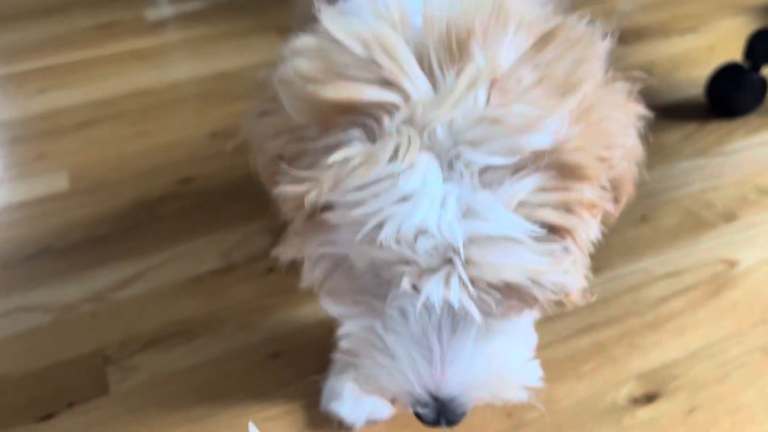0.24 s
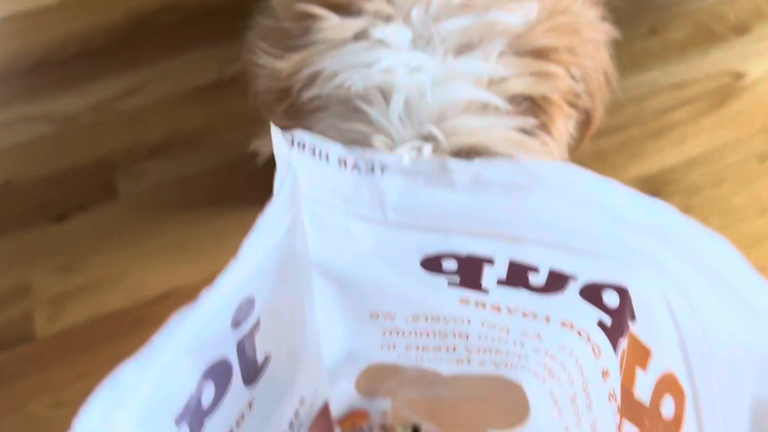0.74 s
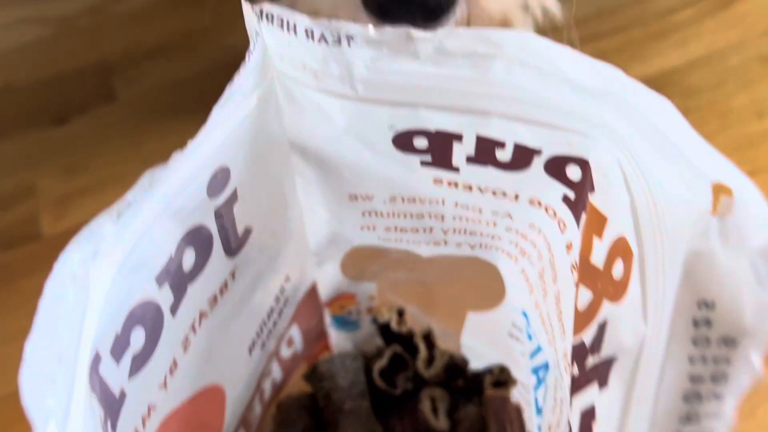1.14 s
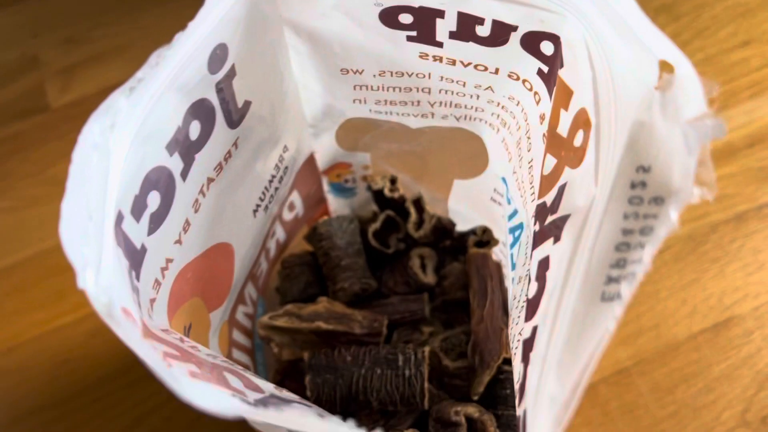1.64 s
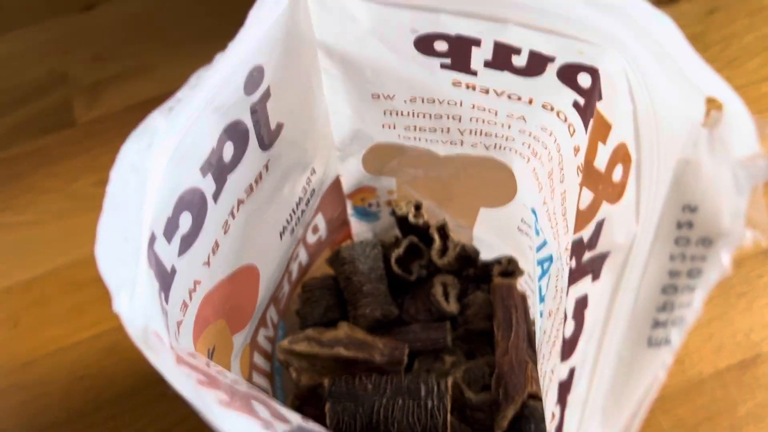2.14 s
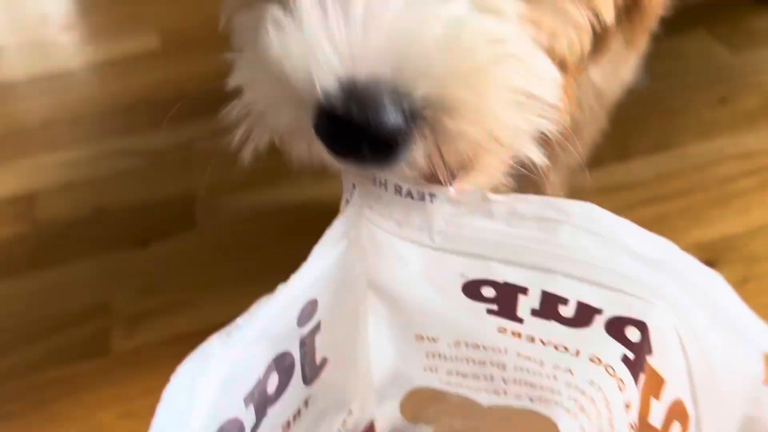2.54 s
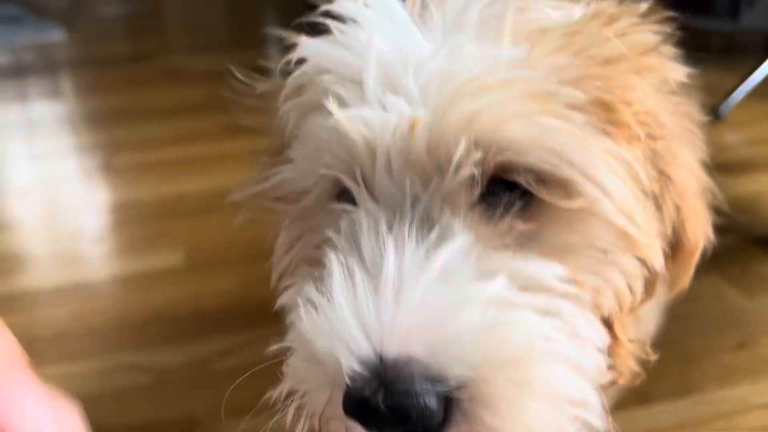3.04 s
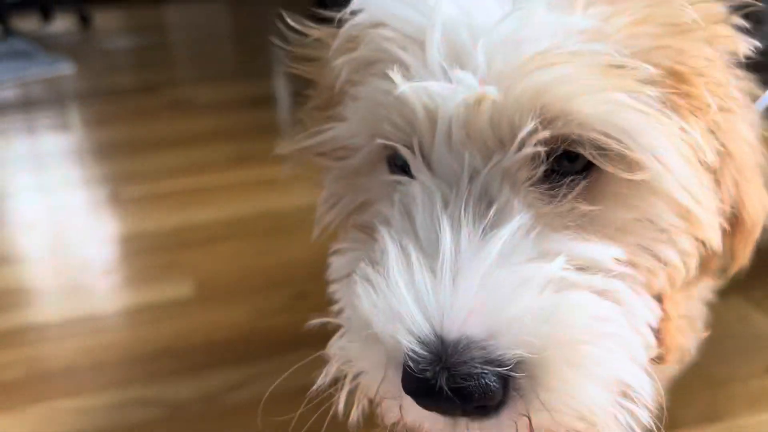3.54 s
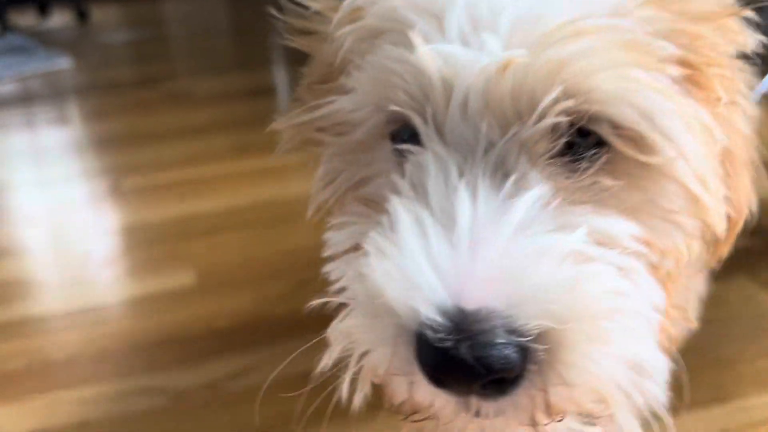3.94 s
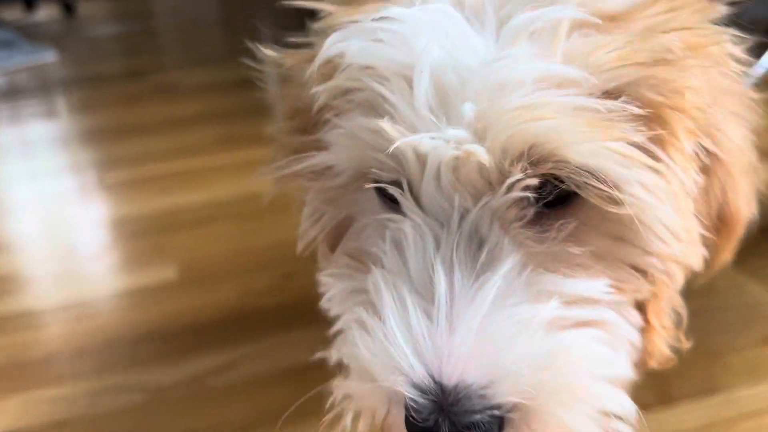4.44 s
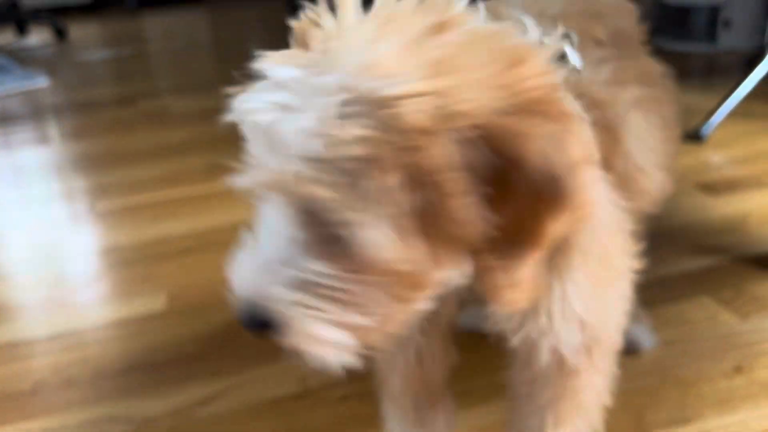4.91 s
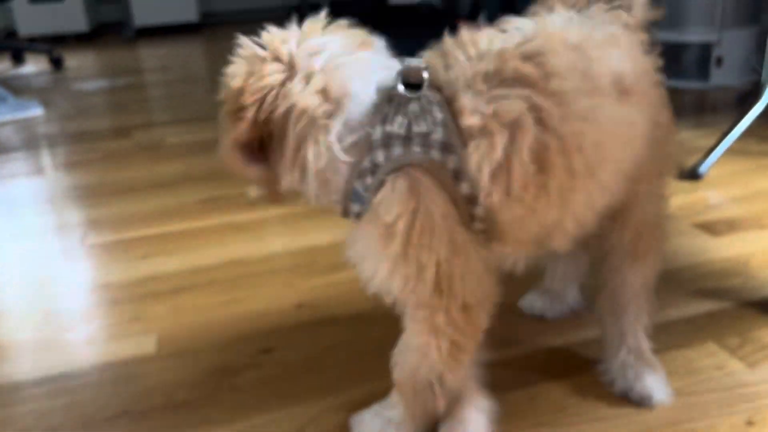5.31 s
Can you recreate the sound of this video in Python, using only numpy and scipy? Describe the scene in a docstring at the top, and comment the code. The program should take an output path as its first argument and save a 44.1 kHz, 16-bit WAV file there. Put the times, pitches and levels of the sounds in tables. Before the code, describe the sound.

Near silence with soft paw taps gives way to a knock of dry treats and dense, snapping plastic bag crinkles, easing toward the end.

```python
"""Stiff treat pouch and puppy

A stiff plastic pouch of dog treats is handled close to two microphones while a puppy pads over a wooden floor.
The pouch slides in the hand, then is squeezed: the grip drives finger rub, film crackle and small creases.
Main creases snap as noise bursts and jolt the walls, which flex with falling thumps; treats knock as damped modes.
A small living room answers faintly over a low hum and the hiss of the microphones."""
import sys
import numpy as np
from scipy import signal
from scipy.fft import rfft, irfft, next_fast_len
from scipy.io import wavfile
from scipy.ndimage import map_coordinates

SR = 44100
rng = np.random.default_rng(int(sys.argv[2]) if len(sys.argv) > 2 else 0)


def file_out(sig):
    """Save sig as 16-bit WAV at sys.argv[1]."""
    # one column per channel
    cols = np.atleast_2d(sig).T
    # limit, then scale
    lim = np.clip(cols, -1, 1)
    pcm = np.round(lim * 32767).astype(np.int16)
    wavfile.write(sys.argv[1], SR, pcm)


N = 245637

LEAD_S = 0.02  # room for the rise before each hit
SAG_DB_PER_S = 6.5  # the grip eases while it is held

# main creases buckling: start_s, wall_ring_hz, ring_db, crack_db, fizz_db, crack_hz, crack_t60_s
MAIN_SNAPS = [(1.702, 1100, -83, -69, -63, 6500, 0.022), (1.728, 1100, -80, -63, -54.5, 2400, 0.011),
              (1.946, 1250, -48.5, -52, -59, 1700, 0.009), (2.274, 900.0, -65, -74.5, -75, 1810.0, 0.007),
              (2.5705, 950, -49.5, -58, -68, 1510.0, 0.013),
              (2.5905, 1030.0, -50, -55, -43, 2480.0, 0.0034), (2.6174, 855.0, -48, -42.5, -38, 2970, 0.01),
              (2.7372, 1100, -39.5, -43.5, -67, 2030, 0.0043),
              (2.751, 1070, -56, -48.5, -48, 1790.0, 0.012), (2.804, 1510, -54, -75, -88, 1670.0, 0.009),
              (2.866, 885, -52, -44, -52, 1630, 0.021), (3.0313, 1540.0, -77.5, -50.5, -70, 3130, 0.021),
              (3.1526, 1120, -49.5, -43, -42, 3820.0, 0.011),
              (3.2252, 1250.0, -54, -62, -69.5, 1510.0, 0.015),
              (3.2721, 1140, -32, -39, -57.5, 1500.0, 0.027), (3.298, 1100, -35, -42, -58, 2430, 0.029),
              (3.352, 900.0, -52, -47, -45.5, 2080.0, 0.013), (3.3704, 736, -23, -30.5, -43.5, 3170, 0.078),
              (3.381, 910, -22.5, -20, -22, 2980, 0.053), (3.3887, 1280, -25, -19.5, -15.5, 3900, 0.012),
              (3.4364, 1150.0, -31, -27.5, -35, 1760, 0.029),
              (3.4411, 1150, -48, -35.5, -37.5, 3750, 0.011), (3.473, 600, -34.5, -39.5, -49, 1550, 0.027),
              (3.5112, 930.0, -55, -56, -66, 2810.0, 0.017), (3.5383, 1300.0, -47, -50, -46, 2160.0, 0.011),
              (3.5719, 830, -29, -33, -40, 1980, 0.0084), (3.5763, 920, -20, -17.5, -19, 2070, 0.018),
              (3.6183, 920, -30.5, -24, -34.5, 3470, 0.015), (3.6763, 1000, -26.5, -24.5, -25, 2530, 0.01),
              (3.7262, 910, -33, -28.5, -27, 6330.0, 0.02), (3.738, 1040, -35.5, -42, -46.5, 5790.0, 0.012),
              (3.7905, 825, -38, -42, -37, 5880.0, 0.029), (3.8035, 670, -31, -39.5, -39, 1880.0, 0.022),
              (3.89, 780, -28, -22, -19.5, 4200.0, 0.012), (3.9004, 790, -26, -29, -35.5, 2630, 0.016),
              (3.906, 865, -34, -37.5, -49, 2960, 0.011), (3.962, 900.0, -36, -54, -61, 1510.0, 0.0091),
              (4.1265, 444, -30, -74, -80.5, 1520.0, 0.023), (4.1302, 845, -34.5, -71, -75, 1530, 0.012),
              (4.2646, 817, -33, -35.5, -47, 2310, 0.018), (4.3326, 430, -33.5, -41, -34.5, 4040, 0.0088),
              (4.3408, 640, -33.5, -44, -44.5, 2000, 0.021),
              (4.3778, 700.0, -42.5, -43.5, -38, 6500, 0.029),
              (4.409, 710.0, -31.5, -41.5, -43.5, 1590.0, 0.033),
              (4.4328, 730, -37, -42, -35, 1740.0, 0.026), (4.4453, 1100, -27, -32, -35.5, 5960, 0.018),
              (4.456, 1030, -32.5, -27.5, -37, 2580.0, 0.017),
              (4.4634, 600, -28.5, -35, -40.5, 1570, 0.023), (4.489, 1190, -42, -50, -38, 2200, 0.025),
              (4.5014, 856, -34, -36, -30, 6490.0, 0.025), (4.524, 1290, -31, -32, -33.5, 1510.0, 0.019),
              (4.5288, 790, -27.5, -36, -36.5, 1510.0, 0.011),
              (4.5398, 1000.0, -55, -38, -28.5, 3610.0, 0.02),
              (4.55, 830, -29.5, -36, -31.5, 5300.0, 0.037),
              (4.5588, 790, -27.5, -35.5, -52.5, 1510.0, 0.022),
              (4.5881, 885, -20, -24.5, -25.5, 3460, 0.011), (4.6003, 900, -46, -51, -37.5, 4200, 0.02),
              (4.6432, 890, -30, -27.5, -32.5, 3560, 0.02), (4.6966, 710, -29.5, -28, -33, 1890, 0.028),
              (4.7217, 1000, -31, -38, -54, 2210.0, 0.012), (4.7353, 1250, -24.5, -23.5, -26, 5830, 0.009),
              (4.7443, 905, -33, -31, -32, 6450.0, 0.022), (4.7562, 1420, -32, -42, -49, 1510.0, 0.02),
              (4.8119, 1010, -35.5, -41, -49.5, 2590.0, 0.018), (4.833, 1090, -38.5, -60, -61, 1600, 0.02),
              (4.8871, 990.0, -34, -25.5, -24.5, 4700.0, 0.0065),
              (4.9384, 920, -31.5, -34, -57, 2100, 0.0087), (5.003, 990.0, -32, -52, -48, 1510.0, 0.017),
              (5.0601, 786, -41, -42.5, -43, 2070.0, 0.033), (5.0881, 716, -32, -33.5, -39.5, 1830, 0.029),
              (5.0933, 990.0, -52, -50, -40.5, 5740.0, 0.034), (5.109, 950, -37.5, -48, -63, 2000, 0.025),
              (5.1294, 940, -42, -46, -46, 2970.0, 0.022), (5.139, 1000, -47, -49, -57, 3800, 0.02),
              (5.1694, 1010.0, -54, -59, -66, 3500.0, 0.01),
              (5.2197, 960, -39.5, -29.5, -33.5, 5000.0, 0.012),
              (5.2384, 1500.0, -43, -37.5, -35, 5570.0, 0.022),
              (5.2758, 1240, -58, -44.5, -51, 1900, 0.015), (5.3318, 1070, -49, -48, -50, 2000.0, 0.024),
              (5.3535, 1670, -36, -37, -71, 3470, 0.016), (5.401, 1300, -35, -46, -75, 2020, 0.023),
              (5.4529, 990, -46.5, -54, -53.5, 5500.0, 0.022),
              (5.5183, 1010.0, -35, -38.5, -54.5, 2280.0, 0.041), (5.533, 1090, -54, -45, -59, 3500, 0.025),
              (5.5575, 1020, -41, -38.5, -38, 1730.0, 0.028)]
# hand squeezes: start_s, hold_s, level_db, release_t60_s, then over the grip: crackle_db, rub_db, sway_db
GRIPS = [(2.569, .21, -62, .25, -15, -1, -2.5), (3.281, 0.055, -56.5, 0.65, -1.5, 6, 1),
         (3.389, .05, -39, 0.23, -5, 6.5, -23), (3.464, 0.17, -44, .8, 0.5, 5, -3),
         (3.744, 0.21, -51.5, 0.54, -8, 6.5, -7), (4.432, 0.094, -39.5, .35, 2.5, 5, -4),
         (4.617, 0.085, -45.5, .4, 2.5, 8, -1.5), (4.72, 0.032, -40.5, .6, -1.5, -3, -23),
         (4.835, .1, -49, .7, 0.5, 5.5, -3.5), (5.079, .06, -50, 1.2, 5.5, -7.5, -12),
         (5.515, .1, -46.5, .7, 0.5, 6.5, 1)]
# glides: film sliding through the hand, and early on (0.77 s, 1.05 s) paws brushing with a bright hiss:
# centre_s, half_length_s, hiss_db, finger_rub_over_hiss_db
GLIDES = [(0.01, 0.04, -72.5, 13), (0.31, 0.095, -75, 5.5), (1.62, 0.031, -73.5, -9),
          (1.814, 0.046, -61, -5.5), (1.903, 0.024, -62.5, 1), (2.04, 0.026, -52.5, -3),
          (2.405, 0.019, -58, 1.5), (2.569, 0.056, -56.5, -6), (2.72, 0.022, -50, -7),
          (3.004, 0.03, -62.5, -8.5), (3.2, 0.08, -59.5, -13), (0.77, 0.03, -81, 11),
          (1.053, 0.058, -86, 19), (3.663, 0.025, -39, -5), (3.807, 0.057, -40.5, -39),
          (4.9, 0.019, -46.5, -5), (5.115, .04, -49.5, -3), (5.552, 0.03, -49.5, -6)]


def amp(db):
    """Decibels to gain."""
    return 10 ** (np.asarray(db) / 20)


def unit(x):
    """Scale to rms 1."""
    return x / np.sqrt(np.mean(x ** 2) + 1e-20)


def scatter(shape=None):
    """Even chance between minus one and one."""
    return rng.uniform(-1, 1, shape)


def along(points, hz):
    """Interpolate (Hz, value) points on a log axis."""
    f, v = np.transpose(points)
    return np.interp(np.log(hz + 1), np.log(f + 1), v)


def wobble(knots_per_s):
    """A smooth random curve."""
    knots = rng.standard_normal(int(N * knots_per_s / SR) + 4)
    return map_coordinates(knots, [np.arange(N) * knots_per_s / SR])


def swell(centre_s, half_s):
    """A smooth rise and fall around a time."""
    return np.exp(-((np.arange(N) / SR - centre_s) / half_s) ** 2 / 2)


def filtered(x, response):
    """x times a complex response of frequency."""
    n = x.shape[-1]
    m = 2 * next_fast_len(n // 2 + 2048)
    return irfft(rfft(x, m) * response(np.fft.rfftfreq(m, 1 / SR)), m)[..., :n]


def colour(points):
    """The causal (minimum-phase) response with the gain of the (Hz, dB) points."""
    def response(hz):
        cepstrum = irfft(np.log(amp(along(points, hz))))
        half = len(cepstrum) // 2
        fold = np.r_[1, np.full(half - 1, 2), 1, np.zeros(half - 1)]
        return np.exp(rfft(cepstrum * fold))
    return response


def resonance(centre_hz, q):
    """One damped resonance."""
    return lambda hz: 1j * hz * centre_hz / q / (centre_hz ** 2 - hz ** 2 + 1j * hz * centre_hz / q)


def stereo(pair, side_db):
    """Two unrelated signals become the shared and the differing part of left and right."""
    return pair[0] + np.array([[1], [-1]]) * amp(side_db) * pair[1]


def noise(spectrum, side_db):
    """Steady coloured stereo noise."""
    return stereo(unit(filtered(rng.standard_normal((2, N)), colour(spectrum))), side_db)


def burst(envelope, response, side_db, seconds):
    """Enveloped noise through a response, with the energy of rms 1 held for the given seconds."""
    pair = filtered(rng.standard_normal((2, len(envelope))) * envelope, response)
    pair = pair / np.linalg.norm(pair, axis=1, keepdims=True)
    return stereo(pair, side_db) * np.sqrt(seconds * SR)


def strike(attack_s, t60_s, peak_s=0.00067, size=4096):
    """An exponential rise turns into an exponential decay near LEAD_S + peak_s."""
    t = np.arange(size) / SR - LEAD_S - peak_s
    return np.exp(-np.logaddexp(-t / attack_s, np.log(1000) * t / t60_s))


def grains(per_second, low_hz, high_hz, cycles, spread_db, size=320):
    """Tiny pings, each with its own moment, pitch, strength and phase at the two microphones."""
    when, pitch, force, left, right = rng.random((int(per_second * N / SR), 5)).T[..., None]
    turns = low_hz * (high_hz / low_hz) ** pitch * np.arange(size) / SR
    strength = amp(-spread_db * np.log(force + .04))
    ping = strength * np.exp(-turns / cycles) * (1 - np.exp(-4 * turns))
    where = ((when * N).astype(int) + np.arange(size)).ravel()
    sides = []
    for phase in (left, right):
        wave = ping * np.sin(2 * np.pi * turns + np.pi * phase)
        sides.append(np.bincount(where, wave.ravel(), N)[:N])
    return unit(np.array(sides))


def add(track, start_s, sound):
    """Mix a sound into the track."""
    part = track[:, max(round(start_s * SR), 0):][:, :sound.shape[-1]]
    part += sound[:, :part.shape[-1]]


def air():
    """Steady noise: the low hum of the quiet room and microphone hiss."""
    # freq_hz, level_db (per Hz)
    air_spectrum = [(25, -29), (60, -4.5), (90, -10), (120, 1), (190, -12.5), (330, -16), (600, -30),
                    (1800, -31.5), (3000, -39), (5500, -42.5), (7600, -30), (9000, -48), (12000, -56),
                    (16000, -69.5)]
    return amp(-65.5) * noise(air_spectrum, side_db=-4.0)


def room(x):
    """Diffuse answer after 5 ms: each frequency of a noise tail dies at its own speed."""
    # freq_hz, t60_s
    decay = [(100, 0.84), (500, 0.11), (2000, 0.27), (6000, 0.28), (15000, 0.18)]
    hz, t, z = signal.stft(rng.standard_normal((2, SR // 2)), SR, nperseg=256)
    tail = signal.istft(z * amp(-60 * t / along(decay, hz)[:, None]), SR, nperseg=256)[1]
    tail = np.pad(tail / np.linalg.norm(tail[0]), ((0, 0), (SR // 200, 0)))
    return signal.fftconvolve(x.mean(0)[None], tail, axes=1)[:, :N]


def paws():
    """Padded paws tap the boards; paws and fur brush over wood and plastic in short swells."""
    # taps: start_s, resonance_hz, level_db
    taps = [(0.13, 585, -58.5), (0.193, 1100, -56.5), (0.436, 905, -56.5), (0.613, 700, -60),
            (0.743, 2320, -57.5), (1.003, 1400, -54.5), (1.379, 1200, -70), (1.585, 1110, -52.5),
            (2.186, 1120, -52.5), (2.308, 1390, -53.5), (2.378, 700, -41)]
    # freq_hz, level_db (per Hz)
    paw_spectrum = [(150, 5.5), (350, 5.5), (520, 6), (750, 1.5), (1200, -3), (1750, -0.5), (2400, -13),
                    (3500, -24.5), (6000, -16.5), (12000, -28)]
    # brushes: centre_s, half_length_s, resonance_hz, level_db
    brushes = [(0.012, 0.042, 920, -57.5), (0.3, 0.083, 960, -62), (0.55, 0.022, 1120, -64),
               (0.67, 0.049, 715, -64.5), (0.85, 0.051, 1730, -64), (1.016, 0.021, 915, -59),
               (1.104, 0.05, 775, -63.5), (1.382, 0.01, 1400, -59.5), (1.469, 0.03, 1450, -67),
               (2.407, 0.0093, 1000, -40.5), (2.43, 0.057, 1190, -57), (4.306, 0.058, 920, -56),
               (4.836, 0.034, 940, -52), (4.932, 0.018, 1120, -38.5), (5.413, 0.009, 970, -31.5)]
    grit_db = -6  # claws and grit over the smooth rub
    out = np.zeros((2, N))
    for start_s, tap_hz, db in taps:
        board = lambda hz: colour(paw_spectrum)(hz) * resonance(tap_hz, q=.7)(hz)
        hit = strike(attack_s=0.000058, t60_s=0.025, peak_s=0.0018)
        add(out, start_s - LEAD_S, amp(db) * burst(hit, board, side_db=-0.5, seconds=0.0062))
    unevenness = amp(2.8 * wobble(60))
    grit = grains(per_second=260, low_hz=450, high_hz=2000, cycles=2, spread_db=5)
    grit = amp(grit_db) * unit(filtered(grit, colour(paw_spectrum)))
    brushing = unevenness * (noise(paw_spectrum, side_db=-2.0) + grit)
    for centre_s, half_s, brush_hz, db in brushes:
        out += amp(db) * swell(centre_s, half_s) * unit(filtered(brushing, resonance(brush_hz, q=1.7)))
    return out


def slides():
    """The speed of each glide, as a gain."""
    return sum(amp(db) * swell(centre_s, half_s) for centre_s, half_s, db, _ in GLIDES)


def sliding():
    """Smooth glides, mostly film over skin, some paws brushing early on, with a thin, uneven hiss."""
    # freq_hz, level_db (per Hz)
    slide_spectrum = [(400, 11.5), (1500, -9.5), (2200, 9), (3200, 5.5), (5500, 10), (8000, 10.5),
                      (10000, 6.5), (12000, 4), (15500, 11.5)]
    unevenness = amp(2.2 * wobble(140))
    return slides() * unevenness * noise(slide_spectrum, side_db=-5.5)


def knocks():
    """A treat drops against the pouch wall, which answers with a short hollow ring of damped modes."""
    # hits: start_s, lowest_ring_hz, level_db
    hits = [(2.371, 400, -35.5), (2.3803, 585, -36), (2.691, 810, -39), (2.852, 700, -32.5),
            (2.862, 760, -32), (2.8683, 603, -16.5), (2.8773, 545, -25.5), (2.912, 510, -48.5),
            (2.963, 920, -51), (3.223, 1227, -45), (3.236, 1230, -47.5), (5.399, 630, -32),
            (5.406, 430, -40)]
    # modes: ratio_to_lowest_ring, level_db, t60_s
    modes = [(1, 0, 0.023), (1.5, 6, 0.0088), (2.55, -15, 0.021), (4.4, -14, 0.0066)]
    contact_s = 0.001  # soft contact
    out, t = np.zeros((2, N)), np.arange(SR // 10) / SR
    for start_s, ring_hz, db in hits:
        ring = sum(amp(mode_db - 60 * t / t60_s) * np.sin(2 * np.pi * ratio * ring_hz * t)
                   for ratio, mode_db, t60_s in modes)
        add(out, start_s, amp(db) * (ring * (1 - np.exp(-t / contact_s)))[None])
    return out


def squeezes(sag_db_per_s):
    """One envelope for each squeeze: a quick rise, a sagging hold, a release."""
    rise_s = 0.015
    start, hold, db, t60, *_ = np.transpose(GRIPS)[..., None]
    t = np.arange(N) / SR - start
    rise = (1 + np.tanh(t / rise_s / 2)) / 2
    held = amp(db - sag_db_per_s * np.clip(t, 0, hold))
    return rise * held * np.exp(-np.log(1000) * np.maximum(t - hold, 0) / t60)


def handling():
    """The squeezed walls rumble, fingers stick and slip, the film crackles in clumps."""
    # spectra: freq_hz, level_db (per Hz)
    rumble_spectrum = [(20, -9.5), (42, -3), (65, 5.5), (130, -3), (230, -1.5), (400, -7.5), (900, -60.5)]
    rub_spectrum = [(150, -7.5), (330, 7), (550, -5), (950, 13), (1500, 4), (2100, 3.5), (3200, -3),
                    (6000, -22)]
    film_spectrum = [(900, -29.5), (1800, -12), (2600, -2), (4000, 1), (6000, 13), (8500, 13.5),
                     (12000, 6.5), (16000, -8.5)]
    sway_share = 0.82  # wall sway follows this share of the grip's dB
    rub_sag_db_per_s = 8.5  # extra sag: fingers rub most at the start, then settle
    crackle_db, rub_db, sway_db = np.transpose(GRIPS)[4:, :, None]
    grips = squeezes(SAG_DB_PER_S)
    clumps = amp(5.5 * np.tanh(wobble(170)) + 1.5 * wobble(50))

    rumble = (amp(sway_db) * grips ** sway_share).sum(0) * noise(rumble_spectrum, side_db=-17)

    slips = grains(per_second=380, low_hz=480, high_hz=2600, cycles=1.3, spread_db=5.5)
    rubbing = (amp(rub_db) * squeezes(SAG_DB_PER_S + rub_sag_db_per_s)).sum(0)
    rubbing = rubbing + sum(amp(db + over_db) * swell(centre_s, half_s)
                            for centre_s, half_s, db, over_db in GLIDES)
    rub = rubbing * unit(clumps * (slips + 0.91 * noise(rub_spectrum, side_db=-3.5)))

    wrinkles = grains(per_second=1000, low_hz=2000, high_hz=10500, cycles=1.2, spread_db=6)
    wrinkles = wrinkles + .35 * noise(film_spectrum, side_db=-6)
    film = (amp(crackle_db) * grips).sum(0) * unit(clumps * wrinkles)
    return rumble + rub + film


def flexes():
    """A wall gives way or recoils from a main snap: a thump falls in pitch to the wall's slow swing."""
    # walls giving way: start_s, final_swing_hz, level_db
    wall_flexes = [(0.0, 75.4, -49), (2.583, 131, -52), (2.61, 63.2, -40), (2.688, 116, -44),
                   (2.733, 88, -46), (2.773, 106, -47.5), (2.864, 63.7, -40.5), (3.275, 71, -23.5),
                   (3.305, 84.4, -30), (3.369, 105.4, -24), (3.383, 54, -17.5), (3.418, 140, -33.5),
                   (3.447, 91, -34), (3.515, 78, -36.5), (3.577, 108, -33), (3.722, 74.4, -25.5),
                   (3.746, 65.3, -34.5), (3.807, 62.6, -29), (3.891, 75, -24.5), (3.925, 92.3, -35),
                   (4.132, 58, -27), (4.337, 56.6, -23.5), (4.428, 89.4, -26.5), (4.458, 73, -26),
                   (4.548, 89, -34), (4.596, 75, -28), (4.697, 113, -30.5), (4.737, 164, -33.5),
                   (4.924, 184, -38), (5.098, 100.6, -32), (5.235, 78, -34), (5.404, 100, -33.5),
                   (5.526, 93.5, -43)]
    recoil_db, recoil_delay_s = -9.5, 0.0017  # level over the snap's ring
    recoil_hz, recoil_octaves = 142.7, 0.86  # swing and its widest scatter
    bend_over, bend_octaves = 2.75, 0.42  # first bending waves: pitch above the swing (x swing), widest scatter
    bend_s = 0.00833  # time constant of the fall in pitch
    rise_s, t60_s = 0.0068, 0.12
    rough = 0.43  # share of irregular flutter
    out, t = np.zeros((2, N)), np.arange(SR // 5) / SR
    push = (1 - np.exp(-t / rise_s)) ** 2 * amp(-60 * t / t60_s)
    push = push / push.max()
    recoils = [(s + recoil_delay_s, recoil_hz * 2 ** (recoil_octaves * scatter()), ring_db + recoil_db)
               for s, _, ring_db, *_ in MAIN_SNAPS]
    for start_s, swing_hz, db in [*wall_flexes, *recoils]:
        bend = bend_over * 2 ** (bend_octaves * scatter())
        turns = np.cumsum(swing_hz * (1 + bend * np.exp(-t / bend_s))) / SR
        wall = lambda hz: resonance(2 * swing_hz, q=1.1)(hz) * resonance(2 * swing_hz, q=.5)(hz)
        flutter = unit(filtered(rng.standard_normal((2, len(t))), wall))
        thump = np.sin(2 * np.pi * turns) + rough * stereo(flutter, side_db=-9.5)
        add(out, start_s, amp(db) * push * thump)
    return out


def small_creases(count=70):
    """Lesser snaps at random: the harder the squeeze, the more frequent and the louder."""
    level_db, spread_db = -8, 8.5  # ring over the grip, widest scatter
    wall_hz, wall_octaves = 940, 0.29
    crack_hz, crack_octaves = 3000, 0.66
    crack_db, fizz_db, bright_spread_db = -7, -3, 3.5  # over the ring; shared widest scatter
    crack_t60_s = 0.027
    grip = squeezes(SAG_DB_PER_S).sum(0)
    work = np.cumsum(np.sqrt(grip))
    at = np.searchsorted(work, work[-1] * (np.arange(count) + rng.random(count)) / count)
    pitch, force, bright, crack = scatter((count, 4)).T
    ring_db = 20 * np.log10(grip[at]) + level_db + spread_db * force
    edge_db = ring_db + bright_spread_db * bright
    return np.c_[at / SR, wall_hz * 2 ** (wall_octaves * pitch), ring_db, edge_db + crack_db,
                 edge_db + fizz_db, crack_hz * 2 ** (crack_octaves * crack), np.full(count, crack_t60_s)]


def dimples(depth_db, count=30):
    """Random peaks and dips: no two creases resonate alike."""
    return colour(np.c_[np.geomspace(800, 16000, count), depth_db * rng.standard_normal(count)])


def stutter(depth_db, per_second=2600, size=4096):
    """A crease gives way in a few tiny jerks, not all at once."""
    knots = rng.standard_normal(size)
    return amp(depth_db * np.tanh(map_coordinates(knots, [np.arange(size) * per_second / SR])))


def snaps():
    """A crease pops over a faint, slower rise and fall: a crack, a shorter fizz and a brief wall ring."""
    # spectra: freq_hz, level_db (per Hz)
    crack_spectrum = [(700, -83.5), (1500, -5), (2100, 0), (3500, -1), (5000, -5), (6500, -4.5),
                      (10000, -38.5)]
    fizz_spectrum = [(3000, -20.5), (5500, -8.5), (6500, -8), (8200, -1), (11500, -13), (16000, -6.5)]
    crack_peak_db, crack_q = 1.5, 4  # the crease's own resonance over the rest of its crack
    fizz_share = 0.66  # fizz t60 over crack t60
    out = np.zeros((2, N))
    skirt = amp(-29) * strike(attack_s=.003, t60_s=.04)
    for start_s, ring_hz, ring_db, crack_db, fizz_db, crack_hz, t60_s in [*MAIN_SNAPS, *small_creases()]:
        crease, jerks = dimples(depth_db=3.7), stutter(depth_db=8.5)

        modes = lambda hz: resonance(ring_hz, q=2.6)(hz) - 0.047 * resonance(1.67 * ring_hz, q=3)(hz)
        wall = lambda hz: modes(hz) * resonance(ring_hz, q=.5)(hz)
        hit = strike(attack_s=0.0016, t60_s=0.021, peak_s=0.000176) + skirt
        ring = burst(hit, wall, side_db=-6.0, seconds=0.0058)

        buckle = jerks * (strike(attack_s=0.00012, t60_s=t60_s) + skirt)
        fold = lambda hz: 1 + amp(crack_peak_db) * resonance(crack_hz, crack_q)(hz)
        edge = lambda hz: colour(crack_spectrum)(hz) * fold(hz) * crease(hz)
        crack = burst(buckle, edge, side_db=-2.5, seconds=0.0062)

        pop = jerks * (strike(attack_s=.0002, t60_s=fizz_share * t60_s, peak_s=.0011) + skirt)
        spray = lambda hz: colour(fizz_spectrum)(hz) * crease(hz)
        fizz = burst(pop, spray, side_db=-21.0, seconds=0.0082)
        add(out, start_s - LEAD_S, amp(ring_db) * ring + amp(crack_db) * crack + amp(fizz_db) * fizz)
    return out


def scene():
    """The near pouch is a little to the left: sooner there, and louder except in the top treble."""
    # freq_hz, left_minus_right_db
    balance = [(50, 3.1), (500, 1.5), (1200, 1.5), (4500, 2.5), (8000, 1.5), (14000, -0.5)]
    # pouch sound sent into the room: freq_hz, level_db
    spill = [(100, -18.5), (700, -18.5), (1800, -8.5), (6000, -13), (14000, -16.5)]
    left_lead_s = 1.7e-5
    puppy = paws()
    near = sliding() + knocks() + handling() + flexes() + snaps()
    sign = np.array([[1], [-1]])
    pan = lambda hz: amp(sign * along(balance, hz) / 2) * np.exp(1j * np.pi * sign * hz * left_lead_s)
    pouch = filtered(near, pan)
    answer = room(filtered(near, colour(spill)) + amp(-7) * puppy)
    return air() + answer + puppy + pouch


def record(dry):
    """The overall tone has narrow dips in the treble, a lift in the deepest bass and a sharp upper limit."""
    # freq_hz, gain_db
    tone = [(20, 7), (42, -4), (7000, -2), (8500, 0), (9400, -2), (10200, -16), (11000, 0.5), (11800, 6),
            (12800, -6), (13800, -28.5), (14700, 3), (15600, -5), (16200, -25.5)]
    top_hz = 16600
    return filtered(filtered(dry, colour(tone)), lambda hz: hz < top_hz)


dry = scene()
out = record(dry)
file_out(out)
```